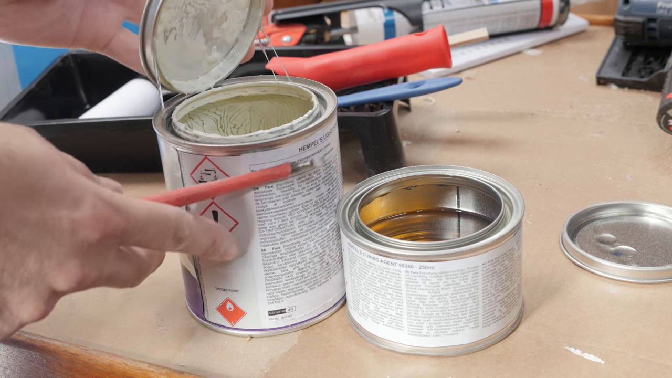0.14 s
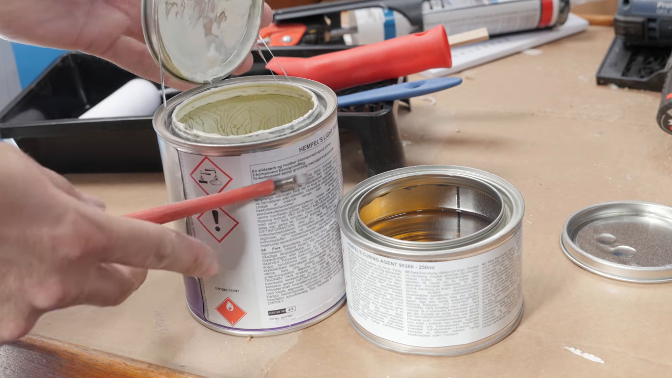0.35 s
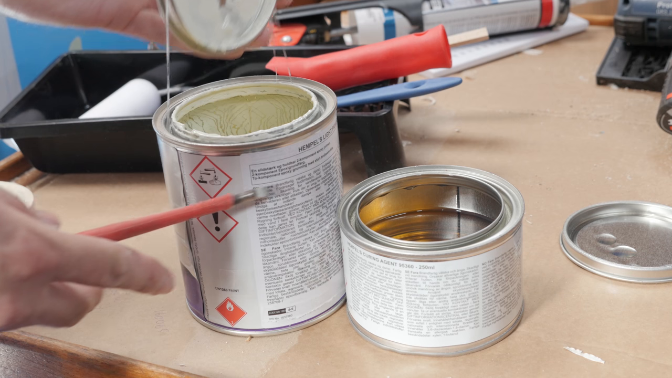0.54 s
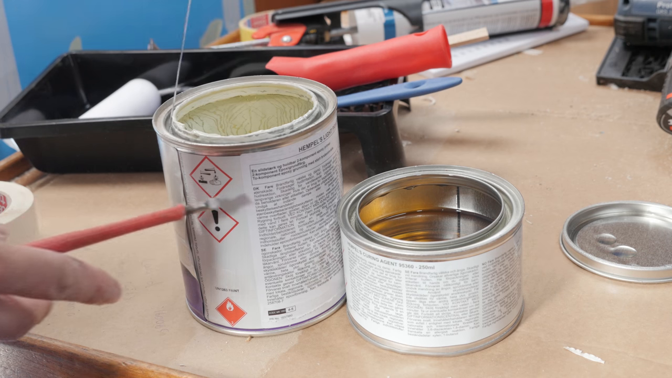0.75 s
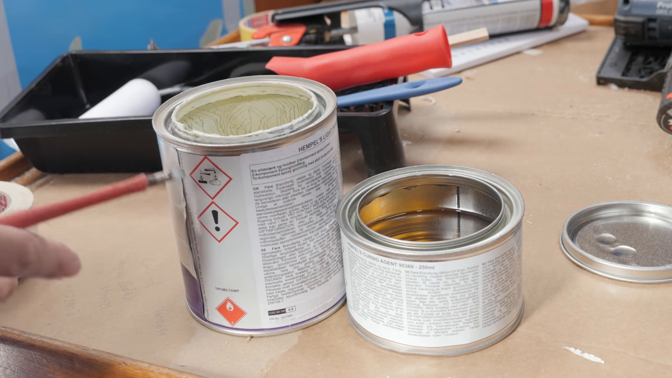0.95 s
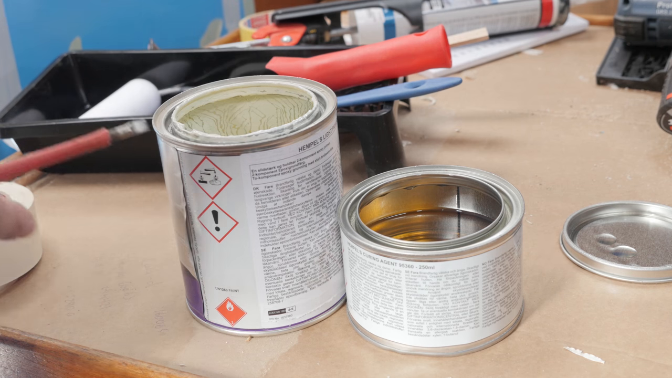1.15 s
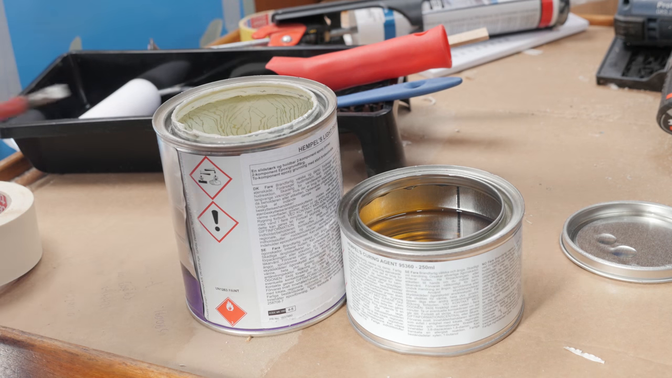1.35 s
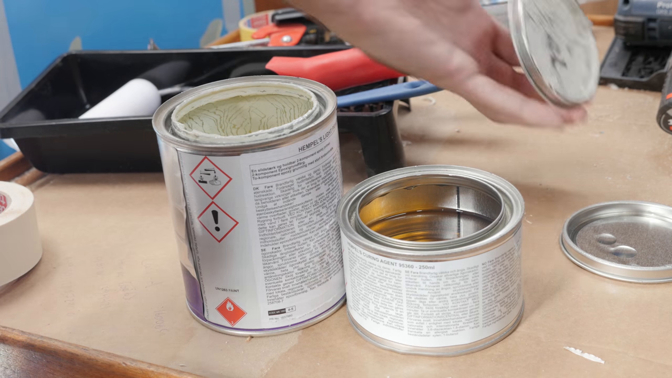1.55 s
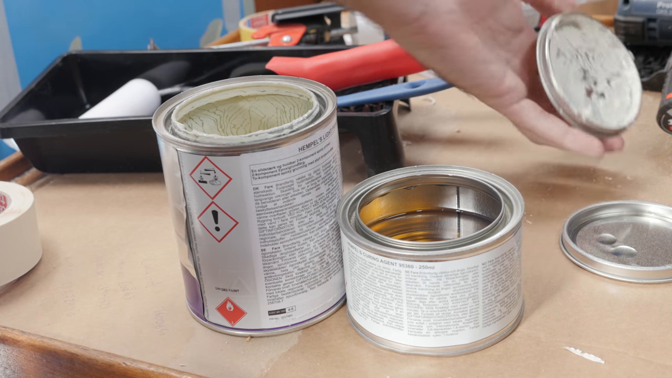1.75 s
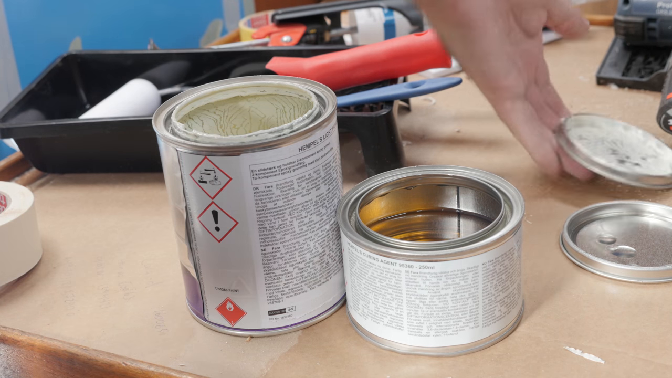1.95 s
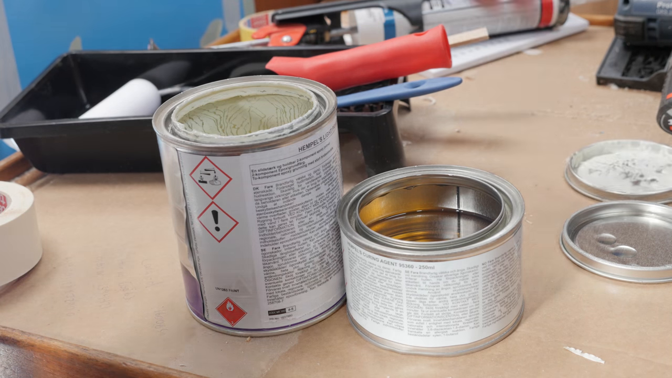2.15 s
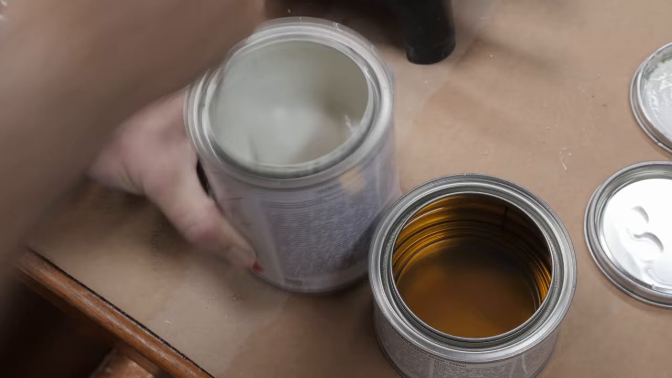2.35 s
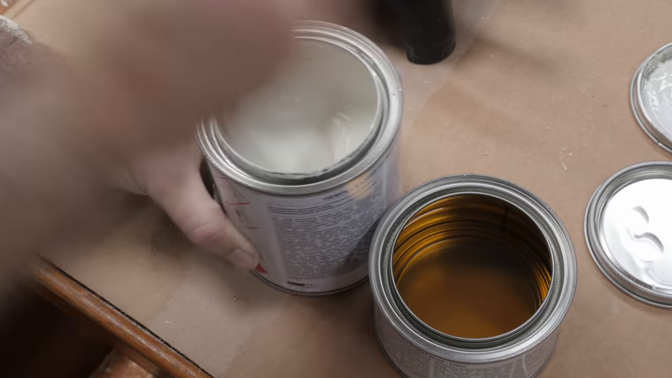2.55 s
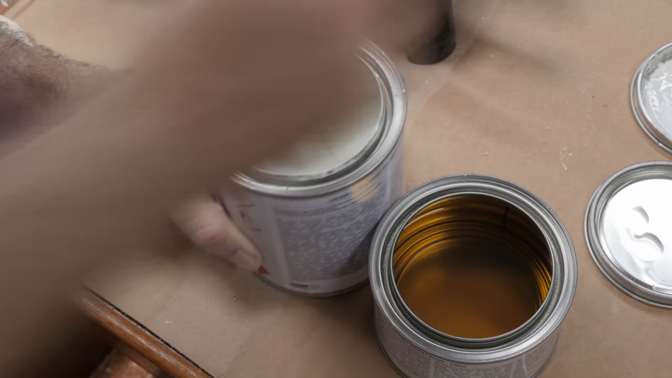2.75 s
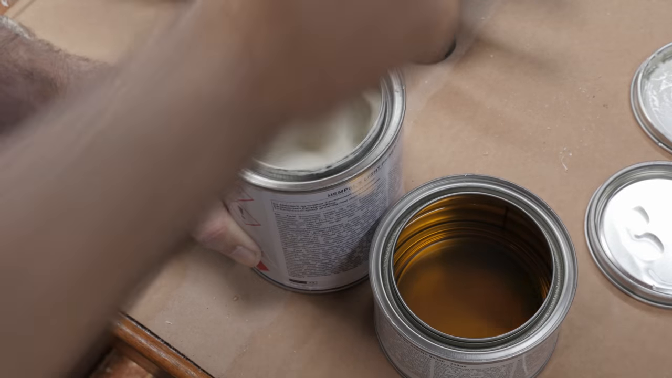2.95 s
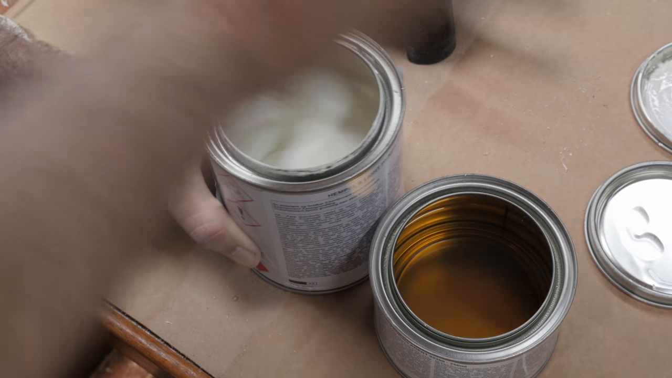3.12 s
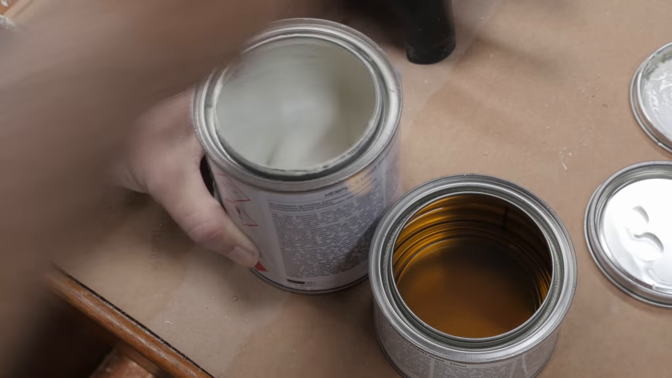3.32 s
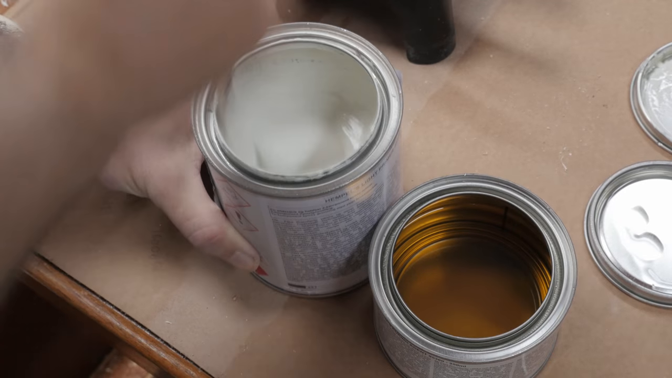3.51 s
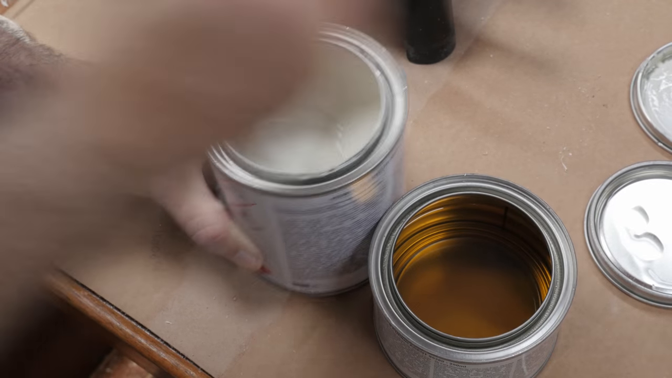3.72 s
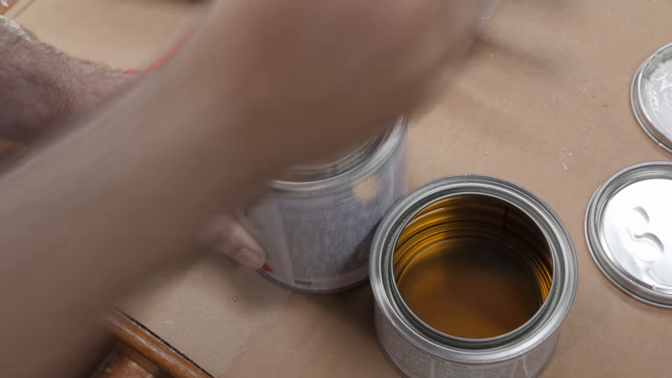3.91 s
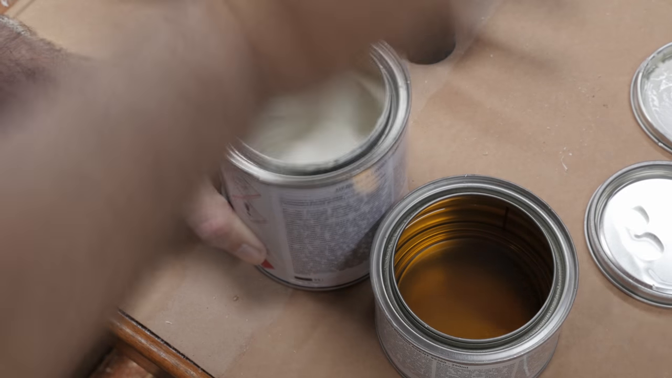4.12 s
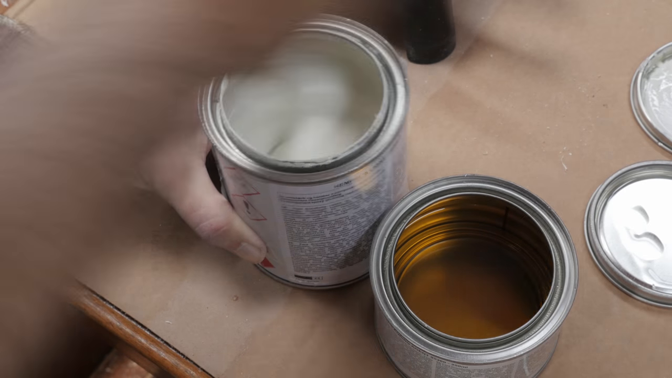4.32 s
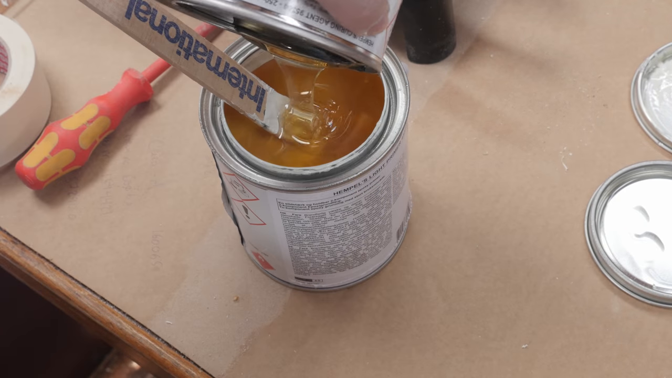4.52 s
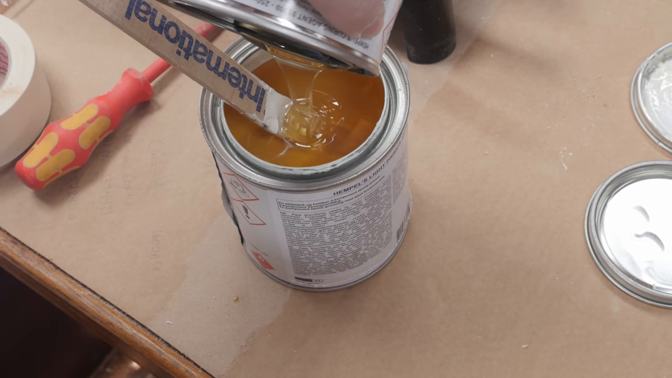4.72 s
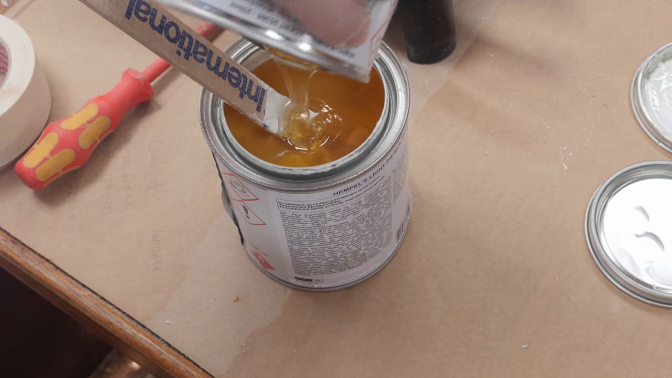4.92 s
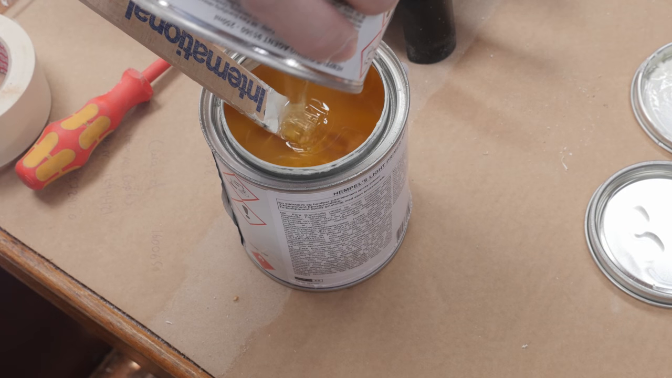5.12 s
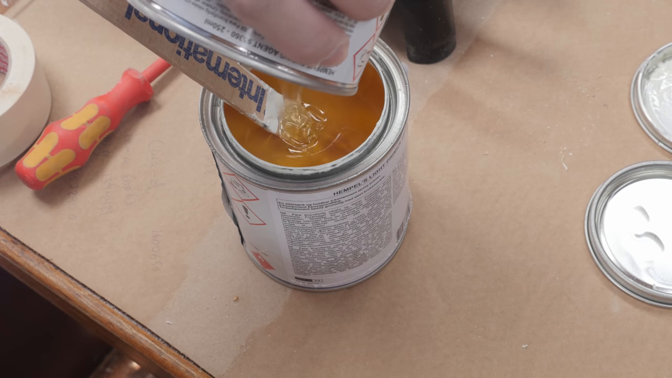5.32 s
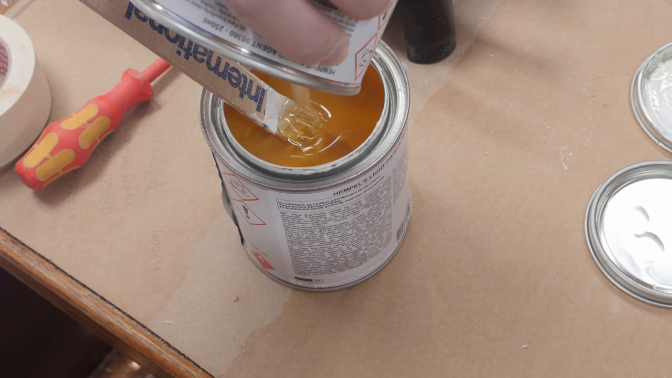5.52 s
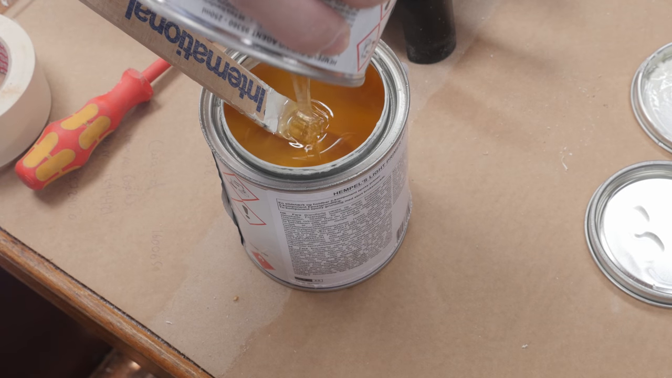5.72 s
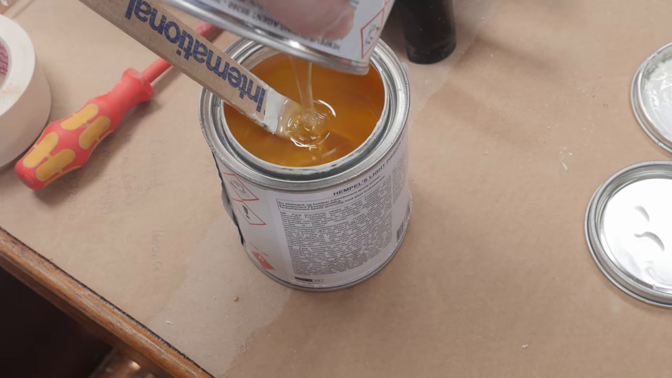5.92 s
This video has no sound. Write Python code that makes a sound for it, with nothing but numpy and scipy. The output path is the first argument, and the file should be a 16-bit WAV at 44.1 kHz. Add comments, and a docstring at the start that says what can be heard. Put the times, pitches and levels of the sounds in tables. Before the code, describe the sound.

In a small room, a metal lid clanks onto a bench, then thick paint is stirred with quick knocks on the tin wall before near-silence.

```python
"""A stick stirs thick paint in a tin: it scrapes the wall as coloured noise and knocks as short ringing modes.
Light taps and ticks ring the tin's rim, mostly before the stirring; its lid is laid down, rings and wobbles.
Bumps in the bench, dull scuffs, a rustling sleeve and sliding fingers are shaped bursts of ringing or noise.
Steady room air lies under everything; short noise echoes place most of the sounds in a small room."""
import sys
import numpy as np
from scipy import signal
from scipy.fft import rfft, irfft
from scipy.io import wavfile
from scipy.ndimage import uniform_filter1d

SR = 44100
rng = np.random.default_rng(int(sys.argv[2]) if len(sys.argv) > 2 else 0)


def waveform_to_disk(signal):
    """Save audio, clipped to [-1, 1], as 16-bit WAV at the path in sys.argv[1]."""
    frames = np.transpose(np.atleast_2d(signal))
    scaled = np.clip(frames, -1, 1) * 32767
    samples = np.round(scaled).astype(np.int16)
    wavfile.write(sys.argv[1], SR, samples)


N = 267422
TIME = np.arange(N) / SR
AGE = TIME[:SR // 2]  # time since the start of a short sound, in seconds
ATTACK = int(.03 * SR)  # samples in the first 30 ms of a blow


def amp(db):
    """Turn decibels into a gain."""
    return 10 ** (np.asarray(db) / 20)


def noise(points, size=N):
    """Make noise of rms 1, coloured by (frequency [Hz], level [dB]) points and thinned below 20 Hz."""
    hz, db = np.transpose(points)
    f = np.maximum(np.arange(size // 2 + 1) * SR / size, 1)
    colour = amp(np.interp(np.log(f), np.log(hz), db)) * np.minimum(f / 20, 1) ** 2
    x = irfft(rfft(rng.standard_normal(size)) * colour, size)
    return x / x.std()


def walk(rate):
    """Wander smoothly around 0, with a spread a little under 1 and `rate` new targets a second."""
    step = int(SR / rate)
    return uniform_filter1d(np.repeat(rng.standard_normal(N // step + 1), step), step)[:N]


def fade(t60):
    """Die away by 60 dB in t60 seconds."""
    return np.exp(-np.log(1000) * AGE / t60)


def lowpass(x, top_hz):
    """Soften everything above top_hz."""
    return signal.sosfilt(signal.butter(2, top_hz, fs=SR, output="sos"), x)


def gesture(start, length, attack, t60):
    """Shape one movement: its gain rises, holds until its length is over, then dies away."""
    age = TIME - start
    return np.clip(age / attack, 0, 1) * np.exp(-np.log(1000) * np.maximum(age - length, 0) / t60)


def swell(s, width):
    """Draw a flat-topped bump of height 1 around a moment."""
    distance = ((TIME - s) / width) ** 2
    return np.exp(-distance ** 2)


def ring(modes, tilt_db=0, scatter_db=2, detune=0, free=1, together=False):
    """Sum fading sine tones; each blow lands on another spot, so it weights and tunes them anew."""
    hz, db, t60 = np.transpose(modes)
    chance = rng.standard_normal((len(hz), 2))
    sign = rng.choice([-1, 1], len(hz))
    gain = amp(db + tilt_db * np.log2(hz / hz[0]) + scatter_db * chance[:, 0])
    # modes that start together leave deep valleys between them
    if not together:
        gain = gain * sign
    hz = hz * (1 + detune * chance[:, 1])
    return sum(g * np.sin(2 * np.pi * f * AGE) * fade(t * free) for f, g, t in zip(hz, gain, t60))


def peak(x, db):
    """Set the peak level of a blow."""
    return x * amp(db) / np.abs(x).max()


def loud(x, db):
    """Set the rms level of a blow's attack."""
    return x * amp(db) / np.sqrt(np.mean(x[:ATTACK] ** 2))


def add(track, s, x):
    """Lay a sound into a track at s seconds."""
    i = int(s * SR)
    track[i:i + len(x)] += x[:N - i]


def room(x, early_db, late_db, early_t60=0.078, low_t60=0.32, high_t60=0.17):
    """Add quick reflections off bench and tools, then the tail of a small room, whose treble dies first."""
    early = rng.standard_normal(len(AGE)) * fade(early_t60) * (AGE > .002)
    low = lowpass(rng.standard_normal(len(AGE)), 3500) * fade(low_t60)
    high = 0.68 * rng.standard_normal(len(AGE)) * fade(high_t60)
    late = (low + high) * np.clip(AGE / 0.014, 0, 1)
    echo = amp(early_db) * early / np.linalg.norm(early) + amp(late_db) * late / np.linalg.norm(late)
    return x + signal.fftconvolve(x, echo)[:N]


def sheet(x, t60):
    """Pass friction through the many close, short modes of thin sheet metal, as a burst of fading noise."""
    modes = rng.standard_normal(len(AGE)) * fade(t60)
    modes[0] += np.linalg.norm(modes)  # the direct sound
    return signal.fftconvolve(x, modes / np.linalg.norm(modes))[:N]


# colour of a tick on thin metal: (frequency [Hz], relative level [dB per Hz])
TICK_COLOUR = [(500, 4), (2000, 0.5), (4500, 2), (7000, -4), (13000, -7.5), (16000, -14.5)]


def tick(db, t60):
    """Tick like thin sheet metal, whose high modes lie so close that they sound like noise."""
    return loud(noise(TICK_COLOUR, size=len(AGE)) * fade(t60), db)


# colour of the room air: (frequency [Hz], relative level [dB per Hz])
AIR_COLOUR = [(20, -8), (98, -2), (127, -2.5), (163, -4.5), (241, -16), (270, -9), (446, -18.5), (499, -19),
              (738, -19.5), (1190, -24.5), (16000, -44)]


def room_air():
    """Hush steadily, as coloured noise whose level drifts very slightly."""
    return noise(AIR_COLOUR) * amp(-60 + 0.22 * walk(1.5))


# dull scuffs of hand and stick: (time [s], level before trim [dB], fade time t60 [s], top frequency [Hz])
SCUFFS = [(.231, -50, 0.11, 3000), (0.258, -41, 0.096, 3430), (0.266, -41.5, 0.14, 1500),
          (.325, -47, 0.14, 1760), (3.996, -44.5, 0.074, 1800), (4.244, -45.5, 0.11, 1100),
          (4.468, -47.5, 0.16, 1340), (4.488, -45.5, 0.18, 750), (4.767, -58, 0.16, 870),
          (5.245, -55.5, 0.97, 876), (5.324, -53, 0.15, 3900), (5.616, -64, 0.078, 3000),
          (5.876, -57.5, 0.26, 3560)]
# an arm moves in its sleeve: (start [s], length [s], base level [dB])
ARM_MOVES = [(0, 0.33, -58), (0.941, 0.15, -57), (1.16, 0.24, -59.5), (1.387, 0.34, -71),
             (4.507, 0.35, -71), (4.938, 0.038, -64), (5.127, 1, -67.5)]
# colour of the rustling sleeve: (frequency [Hz], relative level [dB per Hz])
CLOTH_COLOUR = [(60, 0), (200, 5), (600, -6), (1500, -10.5), (2500, -18), (3600, -11.5), (5000, -28),
                (16000, -42)]
# metal slides under the fingers: (start [s], length [s], base level [dB])
SLIDES = [(0.112, 0.041, -62.5), (1.486, 0.07, -66), (1.896, 0.14, -56)]


def handling():
    """Scuff, rustle and slide: friction is noise, coloured by what rubs and shaped by each movement."""
    out = np.zeros(N)
    rub_colour = [(80, -25), (200, 3.0), (1500, -0.5), (3700, -1.5), (6000, -22)]
    for s, db, t60, top_hz in SCUFFS:
        rub = lowpass(noise(rub_colour, size=len(AGE)), top_hz)
        soft_start = 1 - np.exp(-AGE / 0.0011)
        add(out, s, loud(rub * fade(t60) * soft_start, db - 4.5))
    arm = sum(amp(db) * gesture(s, length, attack=0.031, t60=0.42) for s, length, db in ARM_MOVES)
    fingers = sum(amp(db) * gesture(s, length, attack=0.0056, t60=0.35) for s, length, db in SLIDES)
    out += noise(CLOTH_COLOUR) * arm * amp(4.5 * walk(30))
    out += sheet(noise(TICK_COLOUR) * fingers * amp(2.5 * walk(250)), t60=0.037)
    return room(out, early_db=-6, late_db=-11.0)


# the tin, the lid or a hand bumps the bench: (time [s], level [dB], strongest frequency [Hz])
THUMPS = [(.041, -46, 251), (.263, -47.5, 190), (1.923, -47, 213), (1.935, -41, 340), (1.958, -44.5, 191.4),
          (2.001, -48, 121), (2.107, -46, 167), (2.717, -46.5, 273), (2.735, -36.5, 130),
          (3.449, -45.5, 148), (3.700, -35.5, 298), (3.718, -30, 142.6)]
# the bench under the tin: (frequency [Hz], relative level [dB], fade time t60 before any shortening [s])
BENCH_MODES = [(53.8, -7.5, 0.19), (105, -0.5, 0.25), (133.4, -10, 0.15), (168.6, -13, 0.21),
               (204, -5, 0.12), (275, -13, 0.04), (336.5, -1, 0.16), (450, -7.5, 0.099), (623, -2.5, 0.04)]
# the hollow of the tin: (frequency [Hz], relative level [dB], fade time t60 [s])
HOLLOW_MODES = [(608, -20, 0.043), (901, 5.5, 0.019), (1010, 10, 0.031)]


def thumps():
    """Bump the bench softly; a filter favours the bench and tin modes near each blow's strongest tone."""
    out = np.zeros(N)
    for s, db, hz in THUMPS:
        boom = ring(BENCH_MODES + [(hz, 6, .065)], detune=0.024, free=0.61)
        boom = boom + ring(HOLLOW_MODES, detune=0.094)
        add(out, s, loud(signal.lfilter(*signal.iirpeak(hz, 2.2, fs=SR), boom), db))
    return room(out, early_db=-24, late_db=-12)


# light taps and ticks on the tin, mostly before the stirring and one during it:
# (time [s], peak level before trim [dB], tick relative to it before trim [dB])
TAPS = [(.040, -35.5, -17.5), (.076, -42.5, -15.5), (.126, -43, -27), (.154, -43, -35), (.560, -69.5, 2.5),
        (.656, -40, -18.5), (.676, -37, -19.5), (0.848, -40, -11), (.852, -36.5, -8.5), (1.212, -52, -17),
        (2.778, -47.5, 1)]
# the rim of the tin: (frequency [Hz], relative level [dB], fade time t60 before shortening [s])
RIM_MODES = [(2245, -9.5, 0.17), (2603, -2, 0.083), (2950, -5, 0.058), (3473, -1, 0.12), (4800, -14, 0.068),
             (5740, -28, 0.063), (7380, -4.5, 0.022), (8350, -10, 0.1), (10470, -18, .08),
             (12300, -17, .07), (13760, -17, .09)]


def taps():
    """Tap the tin lightly; its modes ring on under a short bright tick."""
    out = np.zeros(N)
    for s, db, tick_db in TAPS:
        rim = peak(ring(RIM_MODES, scatter_db=1, detune=0.012, free=0.77), db - 2.5)
        add(out, s, rim + tick(db + tick_db - 6, t60=0.015))
        # the thin sheet shivers on after the tick
        add(out, s, tick(db + tick_db - 9.5, t60=0.19))
    return room(out, early_db=-7.0, late_db=-15.0)


# the lid rolls on its rim in a few turns: (start [s], length [s], base level [dB])
ROLLS = [(2.128, 0.017, -33), (2.15, 0.037, -32), (2.207, 0.024, -44.5)]
DRUM_HZ, DRUM_SAG_HZ_PER_S = 1348, 150  # pitch at the first roll, and how fast it sinks


def wobble():
    """Swell the lid's drum mode as the rim rolls; it sinks a little and chatters on the board once a cycle."""
    rolling = sum(amp(db) * gesture(s, length, attack=0.01, t60=0.06) for s, length, db in ROLLS)
    hz = DRUM_HZ - DRUM_SAG_HZ_PER_S * (TIME - ROLLS[0][0])
    phase = 2 * np.pi * np.cumsum(hz * (1 + 0.0021 * walk(120))) / SR
    drum = np.sqrt(2) * np.sin(phase)
    chatter = sheet(noise(TICK_COLOUR) * np.maximum(np.sin(phase), 0) ** 2, t60=0.033)
    chatter = signal.sosfilt(signal.butter(2, [600, 3400], "bandpass", fs=SR, output="sos"), chatter)
    return rolling * amp(1.1 * walk(150)) * (drum + amp(-2) * chatter)


# the lid meets the bench: (time [s], ring peak before trim [dB], clack before trim [dB],
# tick before trim [dB], hardness [dB per octave], share of the ring time that the fingers leave [0-1])
LID_HITS = [(1.912, -35, -48.5, -53, 1, 1), (1.936, -40, -46.5, -57, 8, 0.5),
            (1.957, -30.5, -52.5, -57, 9, 0.2), (2.003, -37.5, -60, -56.5, 6, 0.9),
            (2.107, -16.5, -31.5, -40.5, -2, 0.3), (2.111, -27.5, -26.5, -64, -10.5, 1),
            (2.130, -28.5, -40.5, -67, -17.5, 0.55), (2.165, -25, -44, -52, 11, 0.72),
            (2.198, -32.5, -52, -58, 5, 0.64)]
# the lid ringing: (frequency [Hz], relative level [dB], fade time t60 when free [s])
LID_MODES = [(442, -20, 0.15), (1061, -6, 0.059), (1342, -4.5, 0.19), (1453, -11, .13), (1583, -12.5, 0.15),
             (2040, -12.5, 0.13), (2290, -20, .08), (2783, -9, 0.09), (2880, -29, 0.17),
             (3775, -14.5, 0.17), (3980, -13.5, 0.17), (4650, -14, 0.12), (5020, -13.5, 0.075),
             (5720, -18.5, 0.095), (6900, -25.5, 0.072), (8330, -29, 0.043)]
# the flat clack of lid on board: (frequency [Hz], relative level [dB], fade time t60 [s])
CLACK_MODES = [(270, -13, 0.046), (720, -2, 0.013), (1030, -2, 0.013), (1460, -8.5, 0.038),
               (1730, -8, 0.011), (2250, -9.5, 0.018), (3470, -2.5, 0.0091)]
# the lid's edge, pinched in the fingers: (frequency [Hz], relative level [dB], fade time t60 [s])
EDGE_MODES = [(4700, 0, .05), (5076, -14, .09), (8420, -9, .04)]


def lid():
    """Lay the lid down: each hit rings its modes, clacks on the board and ticks; then it wobbles to rest."""
    out = np.zeros(N)
    for s, ring_db, clack_db, tick_db, hard_db, free in LID_HITS:
        ringing = ring(LID_MODES, tilt_db=hard_db, detune=0.0056, free=free)
        add(out, s, peak(ringing, ring_db - 4.0))
        add(out, s, loud(ring(CLACK_MODES, detune=0.017), clack_db - 3.0))
        add(out, s, tick(tick_db - 1.0, t60=0.02) + tick(tick_db - 8.0, t60=0.14))
    # the edge pings as it first touches down
    add(out, 1.912, peak(ring(EDGE_MODES), -35.5))
    return room(out, early_db=-19.0, late_db=-8.5) + wobble()


# the stick knocks on the tin wall: (time [s], level before trim [dB], then relative to it and before trim:
# bench [dB], hollow [dB], tick [dB]; wall pitch before detuning [Hz],
# easing of the drag just before, negative where it grows [dB])
KNOCKS = [(2.492, -28, -20.5, -23.5, -16.5, 3380, 0.5), (2.597, -23, -26, -21.5, -19.5, 3400, 0.5),
          (2.745, -25, -14.5, -22, -17.5, 3270, 0.5), (2.829, -27.5, -26, -17.5, -23, 3350, -1),
          (3.007, -28, -12.5, -13.5, -22, 3290, 9), (3.081, -24, -26.5, -20.5, -34, 3230, 0.5),
          (3.148, -48.5, -34, 3.5, -32, 3420, 0.5), (3.247, -23, -17.5, -21, -17.5, 3360, 9),
          (3.319, -20.5, -21.5, -24.5, -43, 3230, -3), (3.473, -27, -16, -14.5, -39, 3360, 1),
          (3.567, -20.5, -22, -18.5, -41, 3310, -2.5), (3.727, -34, -9, -19, -18, 3470, -4.5),
          (3.819, -26, -27.5, -20.5, -22.5, 3420, -1), (3.953, -22.5, -19, -18.5, -15.5, 3385, 1),
          (4.062, -21, -30, -22, -16.5, 3400, -3.5), (4.215, -23.5, -17.5, -19.5, -18.5, 3340, 6.5),
          (4.313, -18.5, -25.5, -19, -20, 3340, 9)]
# the gripped, paint-damped wall: (frequency [Hz], relative level [dB], fade time t60 [s])
WALL_MODES = [(1650, -6.5, 0.0079), (1943, -5, 0.015), (2517, -14.5, 0.067), (3130, -8.5, 0.014),
              (3386, -5, 0.017), (4144, -5, 0.013), (4276, -6, .018), (4690, -14, 0.049),
              (6470, -13, 0.015), (6820, -15.5, 0.015), (8560, -36, 0.013), (10760, -31, 0.02),
              (13200, -37, 0.016)]
# colour of gritty paint on tin: (frequency [Hz], relative level [dB per Hz])
SCRAPE_COLOUR = [(150, 3), (450, 5.5), (700, -1), (1000, 0.5), (1500, -12.5), (2150, -9.5), (3400, -1.5),
                 (3800, -5), (4700, -5.5), (5800, -11.5), (7000, -11), (9600, -15.5), (13400, -24),
                 (16000, -33)]


def knocks():
    """Knock on the wall: it rings, then the hollow of the tin answers and the bench shakes."""
    metal, body = np.zeros(N), np.zeros(N)
    for s, db, bench_db, hollow_db, tick_db, hz, _ in KNOCKS:
        # an extra wall mode depends on where the stick lands
        wall = ring(WALL_MODES + [(hz, 0, .016)], scatter_db=2.5, detune=0.016, together=True)
        wall = wall * (1 - np.exp(-AGE / 0.00028))
        add(metal, s + .0005, loud(wall, db - 15.0) + tick(db + tick_db - 3.0, t60=0.016))
        # the stick grazes the wall an instant before it lands
        add(metal, s - .0013, loud(wall, db - 33.5))
        # the jolt sets the whole tin rattling faintly
        rattle = noise(SCRAPE_COLOUR, size=len(AGE)) * fade(0.27)
        add(metal, s + .003, loud(rattle, db - 28.0))
        add(body, s + 0.001136, loud(ring(HOLLOW_MODES, detune=0.012), db + hollow_db - 3.0))
        add(body, s + 0.00199, loud(ring(BENCH_MODES, scatter_db=6, detune=0.025), db + bench_db))
    metal = room(metal, early_db=-9.0, late_db=-17.0)
    return metal + room(body, early_db=-8.5, late_db=-10, low_t60=0.25)


GRIT_PER_S, GRIT_SPREAD_DB = 630, 5  # clicks a second on average, and how unequal they are


def grit():
    """Click specks of dry paint under the stick at random, mostly small and now and then large."""
    hits = rng.random(N) < GRIT_PER_S / SR
    size_db = GRIT_SPREAD_DB * np.minimum(rng.exponential(size=N), 4)
    clicks = hits * rng.choice([-1, 1], N) * amp(size_db)
    x = signal.fftconvolve(clicks, noise(TICK_COLOUR, size=len(AGE)) * fade(0.0048))[:N]
    return x / x.std() * amp(-65.5)


# wall resonances that the drag excites: (frequency [Hz], width [Hz], base level [dB])
SHEEN_MODES = [(1440, 620, -61.5), (4660, 160, -65.5), (5300, 1500, -65), (6840, 500, -71.5),
               (10830, 340, -73), (13350, 700, -70.5)]


def sheen():
    """Excite wall resonances with the drag: narrow bands of noise, each wandering in level."""
    out = np.zeros(N)
    for hz, width, db in SHEEN_MODES:
        mode = signal.lfilter(*signal.iirpeak(hz, hz / width, fs=SR), rng.standard_normal(N))
        out += mode / mode.std() * amp(db + 4 * walk(31))
    return out


# the stick catches on the wall: (time [s], extra buzz [dB])
CATCHES = [(2.46, 6), (2.65, 6), (2.89, 10.5), (3.16, 0.5), (3.77, 3), (4.12, 7.5), (4.40, 4)]
# colour of the wall's buzz: (frequency [Hz], relative level [dB per Hz])
BUZZ_COLOUR = [(1500, -49), (2200, -11), (2400, -2), (2560, 4.5), (2850, -11), (3400, -1), (3900, -16),
               (6000, -29)]
# colour of thick paint churning: (frequency [Hz], relative level [dB per Hz])
CHURN_COLOUR = [(20, -9), (42, 7), (60, 4), (78, -12), (105, -1), (200, -13.5), (500, -27), (1500, -38.5)]
SCRAPE_DB, BUZZ_DB, CHURN_DB = -54, -56.5, -49.5  # base levels, before they wander
LIFT_LEAD_S, LIFT_WIDTH_S, CATCH_WIDTH_S = 0.032, 0.032, 0.019
SCRAPE_EASE, BUZZ_EASE = 0.84, 0.63  # dB lost for each dB that the drag eases


def stirring():
    """Drag the stick as noise through sheet metal, changing before knocks and buzzing at catches; paint churns."""
    eased_db = sum(db * swell(s - LIFT_LEAD_S, LIFT_WIDTH_S) for s, *_, db in KNOCKS)
    caught_db = sum(db * swell(s, CATCH_WIDTH_S) for s, db in CATCHES)
    rough_db = 1.5 * walk(49) + 3 * walk(900)  # slow and fast unevenness
    scrape = noise(SCRAPE_COLOUR) * amp(SCRAPE_DB - SCRAPE_EASE * eased_db + rough_db)
    scrape = sheet(scrape, t60=0.0062) + sheen() * amp(-SCRAPE_EASE * eased_db)
    buzz = noise(BUZZ_COLOUR) * amp(BUZZ_DB + caught_db - BUZZ_EASE * eased_db + 4.2 * walk(110))
    churn = noise(CHURN_COLOUR) * amp(CHURN_DB + 2.1 * walk(7.8))
    swish = amp(3.9 * walk(14))
    return swish * (scrape + grit() * amp(-eased_db)) + buzz + churn


STIR_START, STIR_END = 2.418, 4.421  # seconds


def scene():
    """Mix all layers; stirring and knocks start and stop abruptly, while room air runs throughout."""
    stir_times = [STIR_START, STIR_START + 0.007, STIR_END - .003, STIR_END]
    stirred = np.interp(TIME, stir_times, [0, 1, 1, 0])
    background = room_air() + handling() + thumps()
    tin_and_lid = taps() + lid()
    return (background + tin_and_lid + stirred * (knocks() + stirring()))[None]


def record(dry):
    """Thin the rumble below 32 Hz and cut the treble steeply above 15900 Hz."""
    thin = signal.sosfilt(signal.butter(2, 32, "highpass", fs=SR, output="sos"), dry)
    return signal.sosfilt(signal.ellip(10, .2, 70, 15900, fs=SR, output="sos"), thin)


dry = scene()
out = record(dry)
waveform_to_disk(out)
```